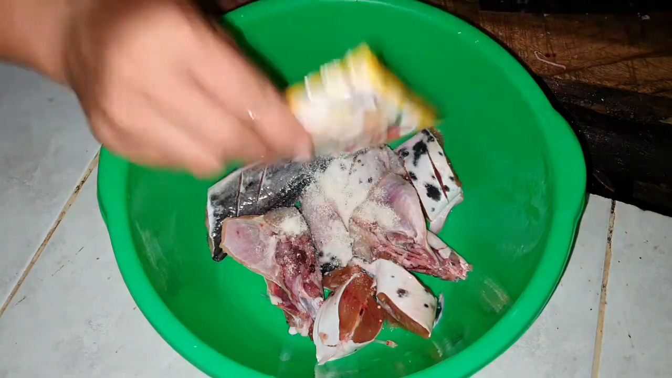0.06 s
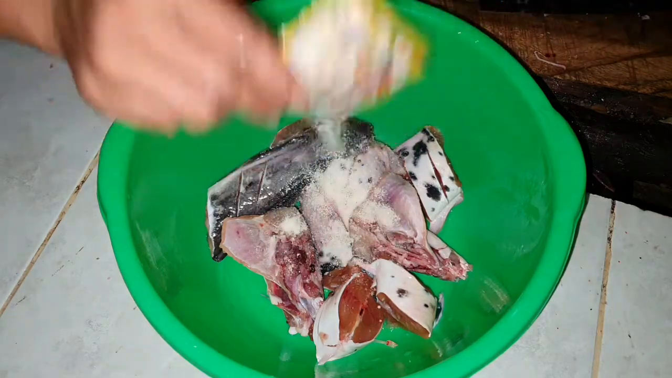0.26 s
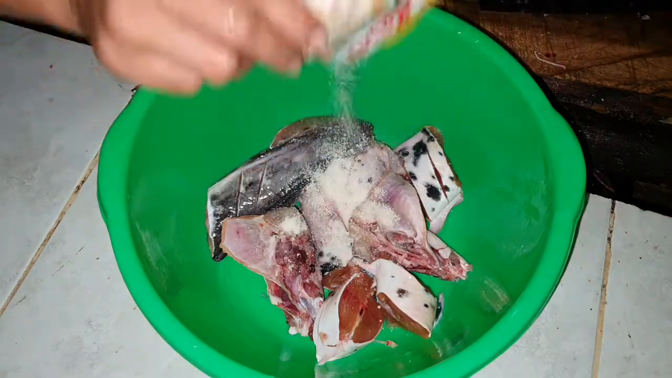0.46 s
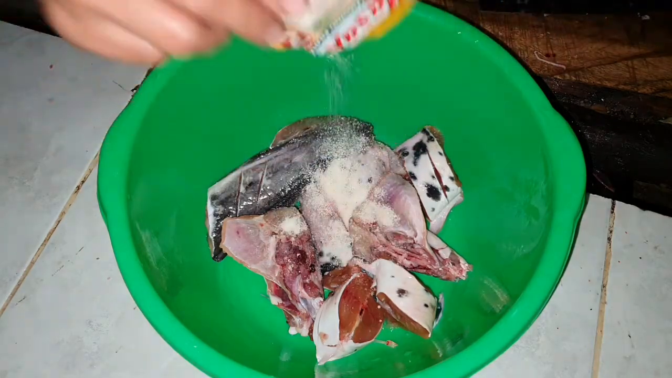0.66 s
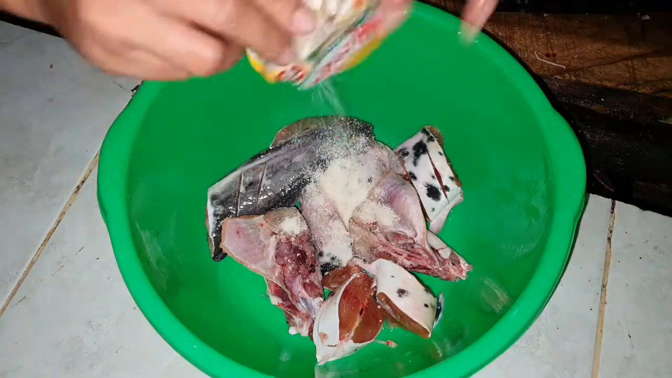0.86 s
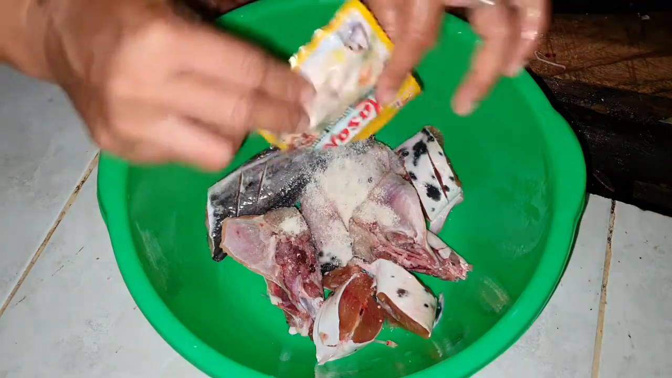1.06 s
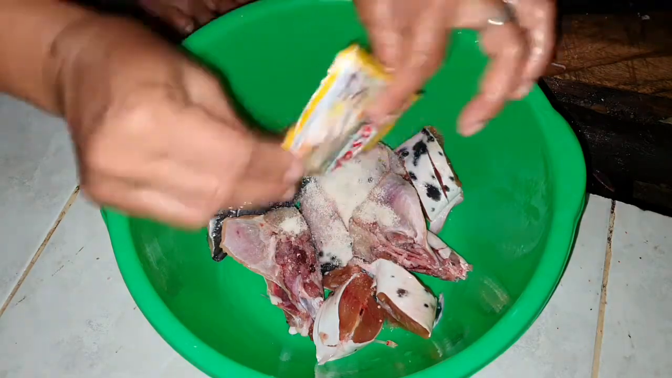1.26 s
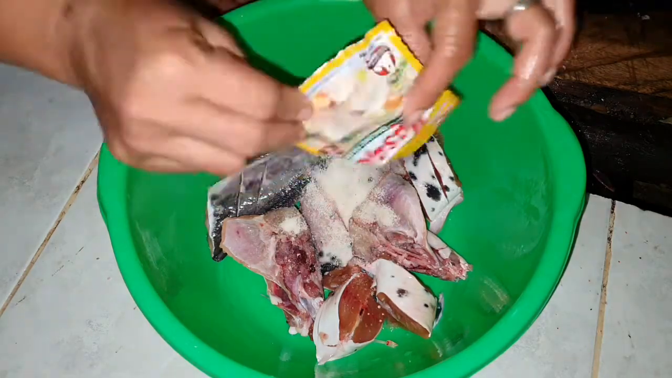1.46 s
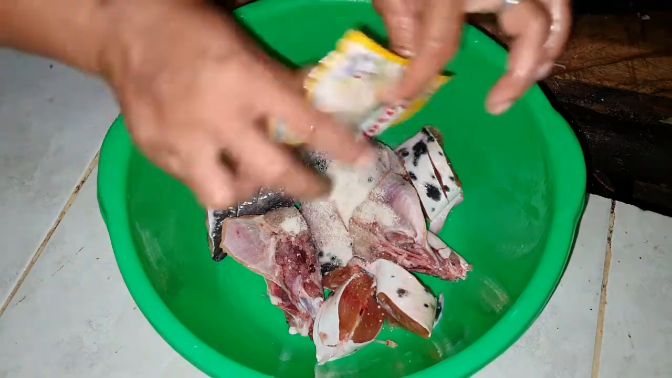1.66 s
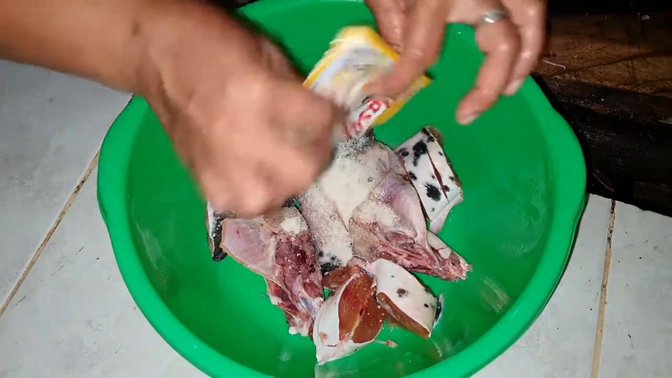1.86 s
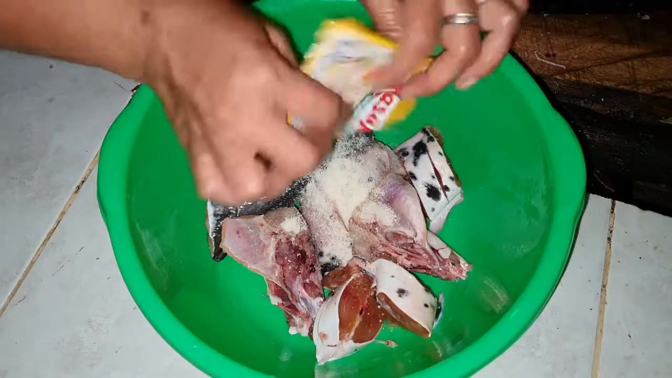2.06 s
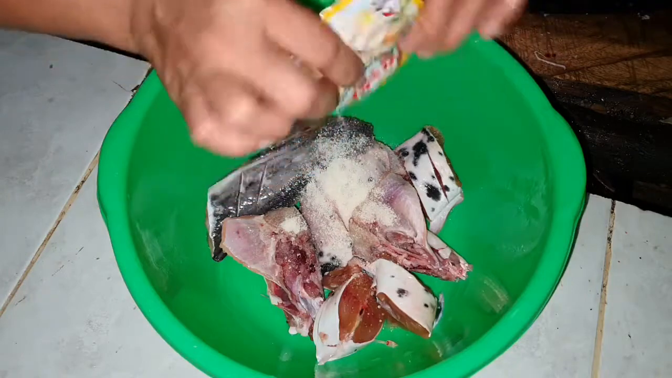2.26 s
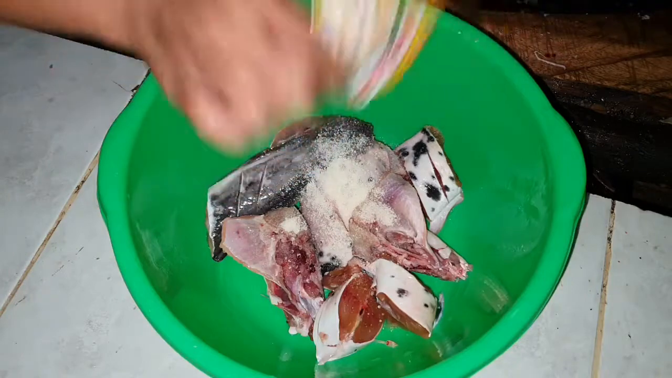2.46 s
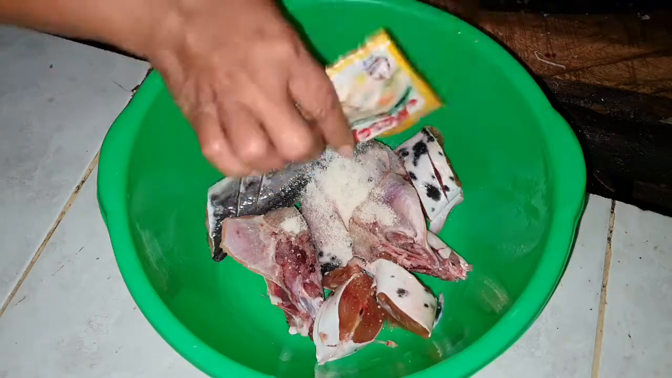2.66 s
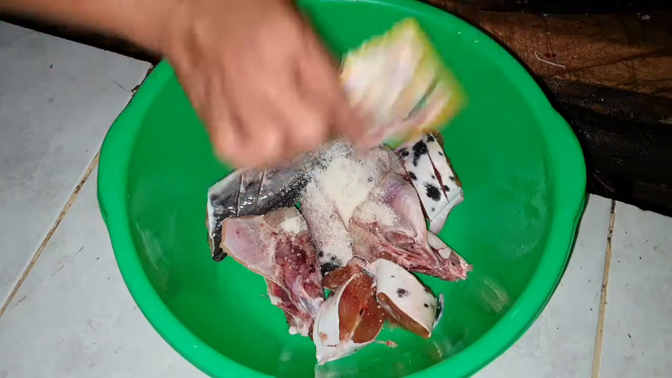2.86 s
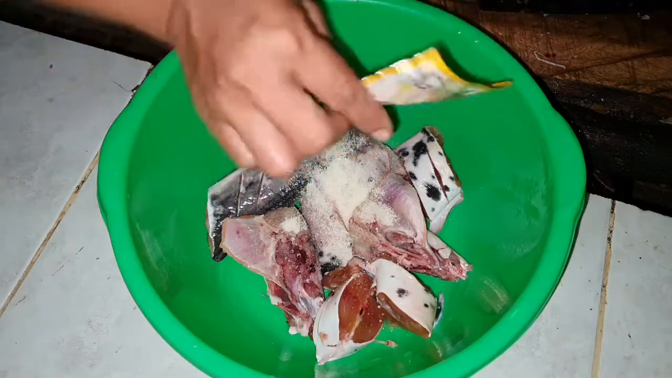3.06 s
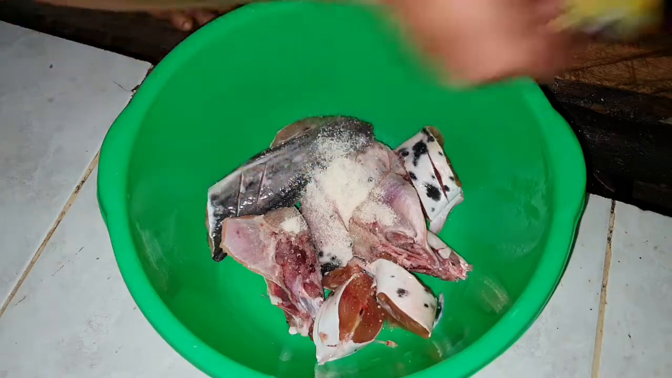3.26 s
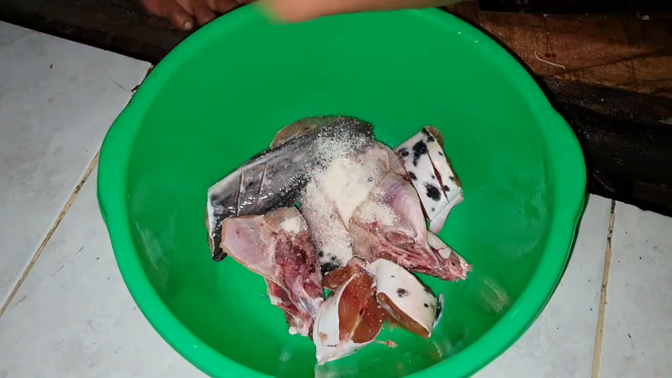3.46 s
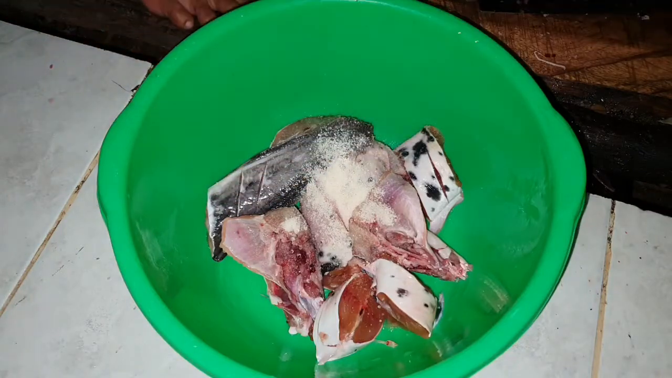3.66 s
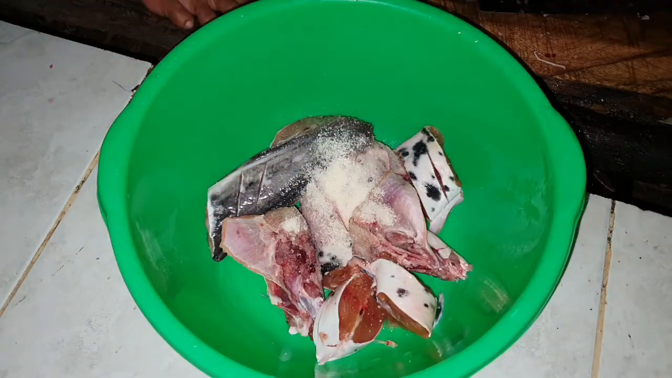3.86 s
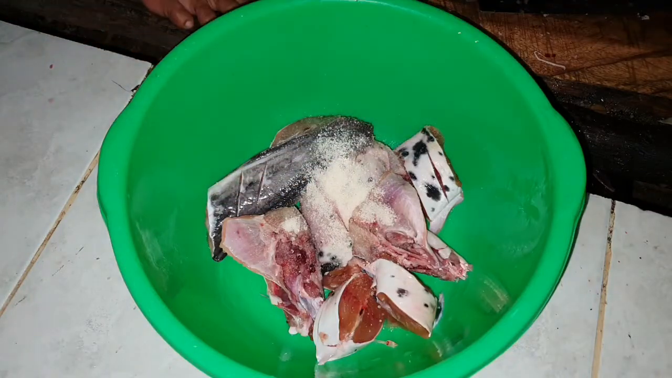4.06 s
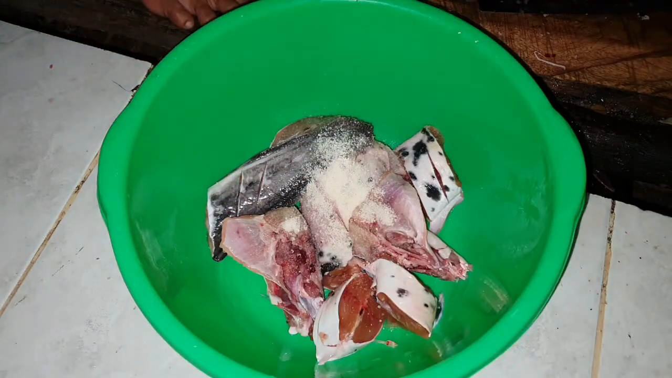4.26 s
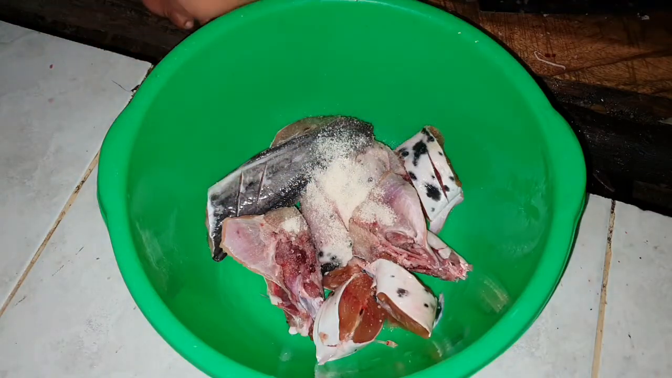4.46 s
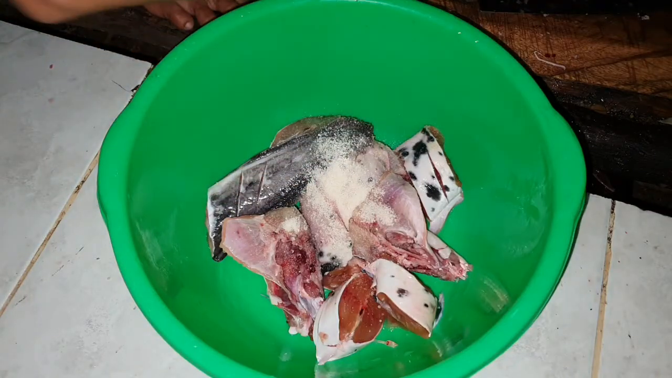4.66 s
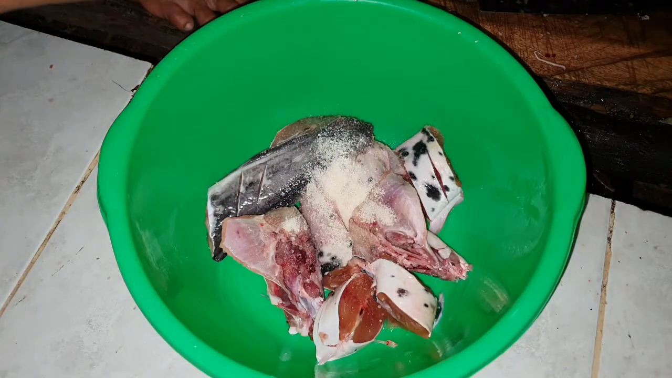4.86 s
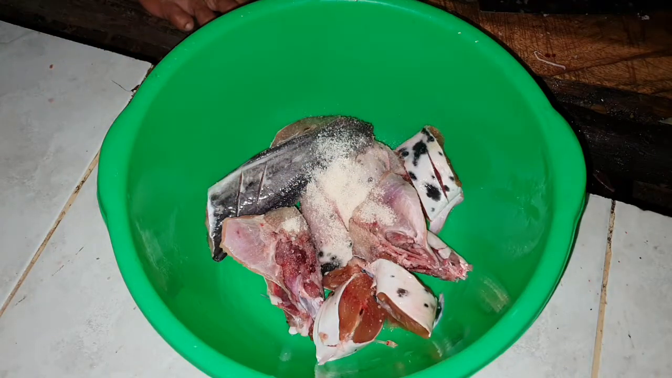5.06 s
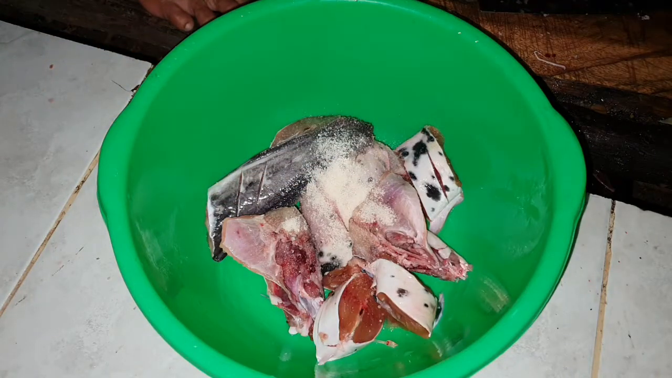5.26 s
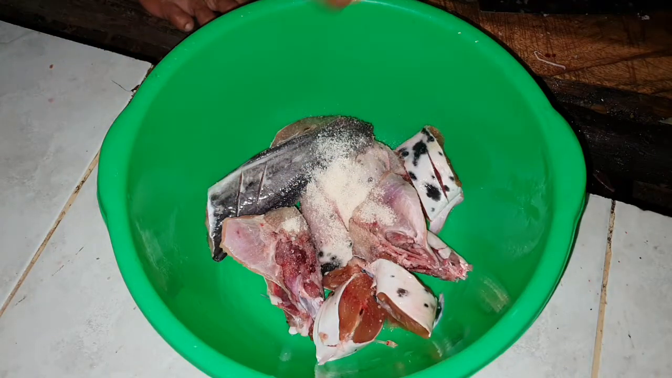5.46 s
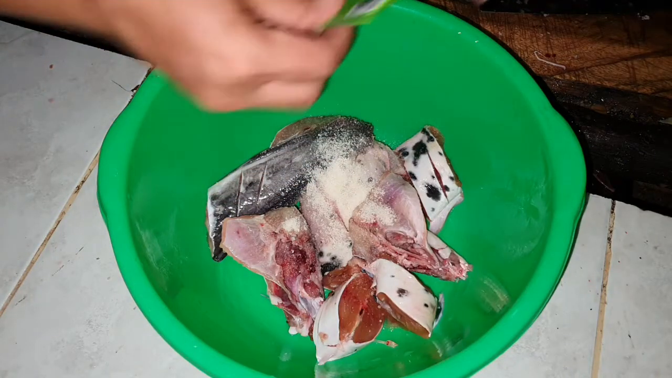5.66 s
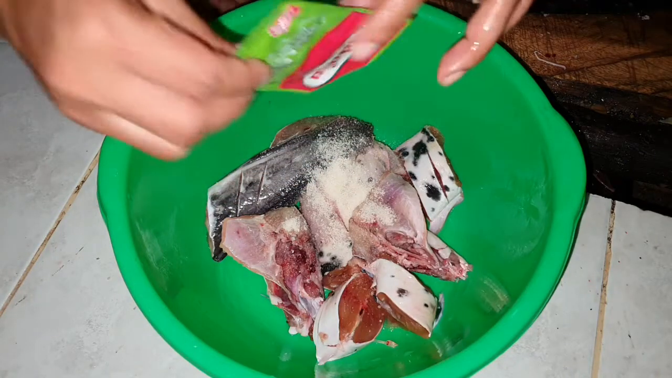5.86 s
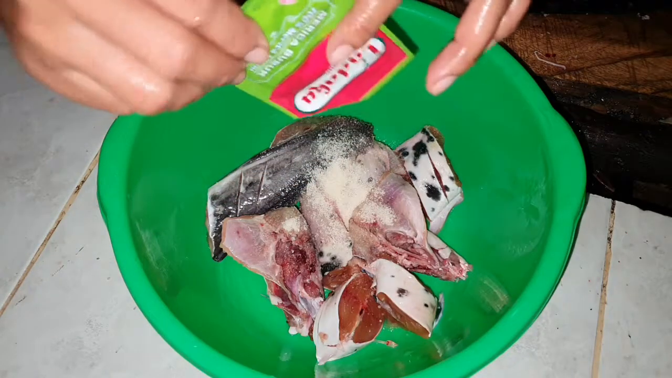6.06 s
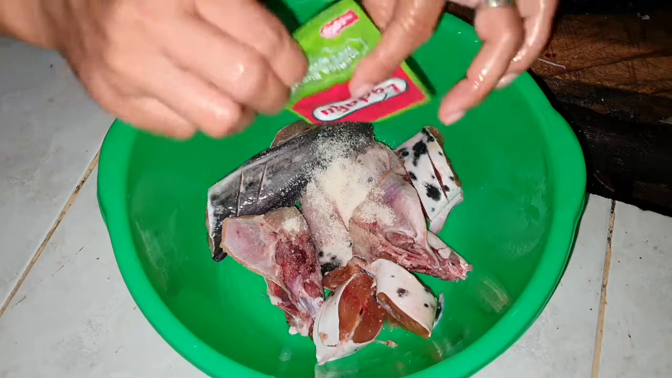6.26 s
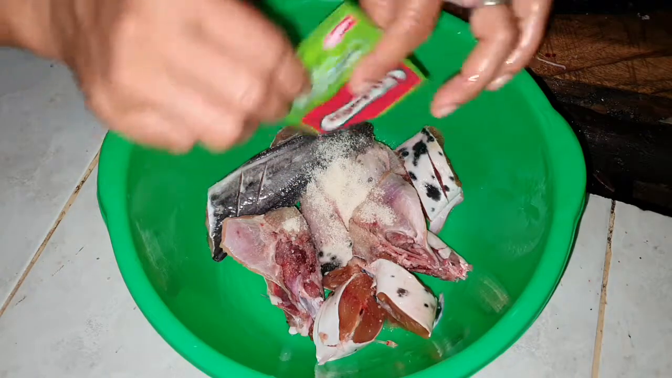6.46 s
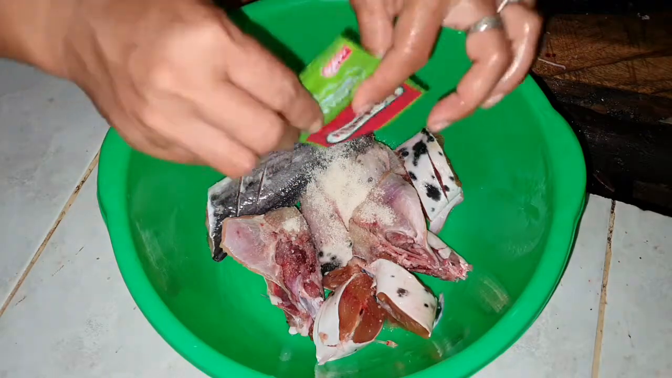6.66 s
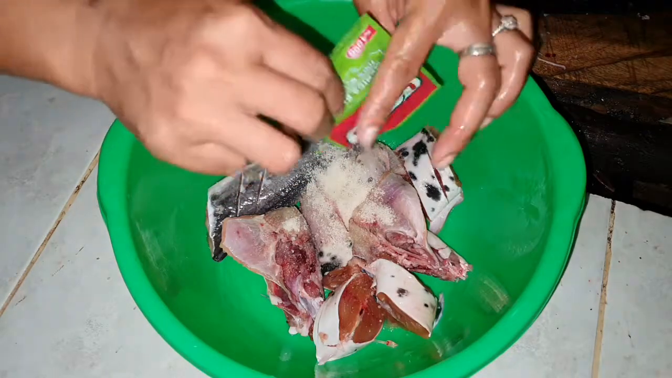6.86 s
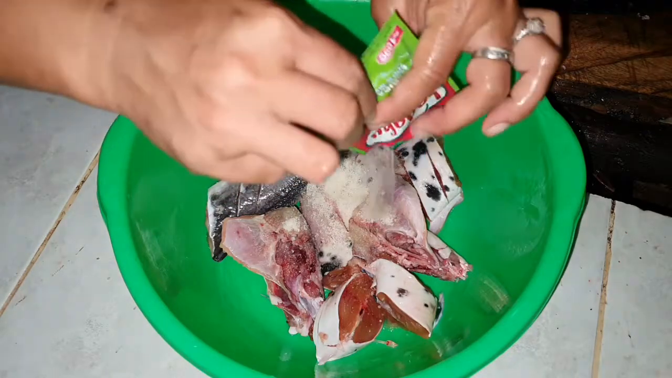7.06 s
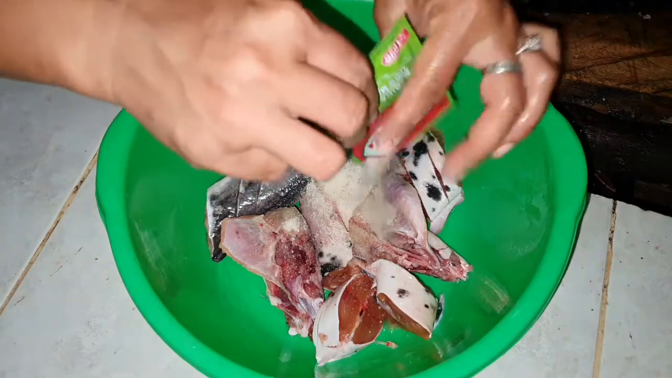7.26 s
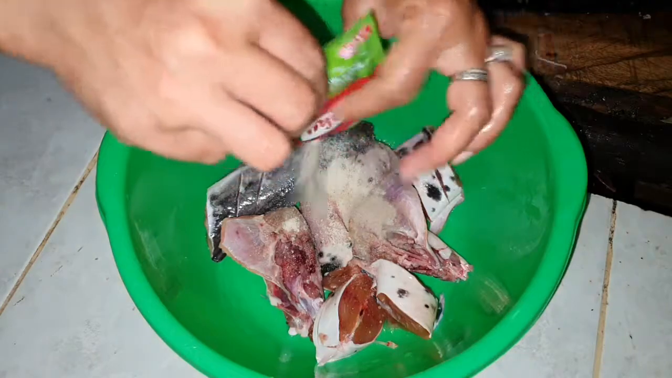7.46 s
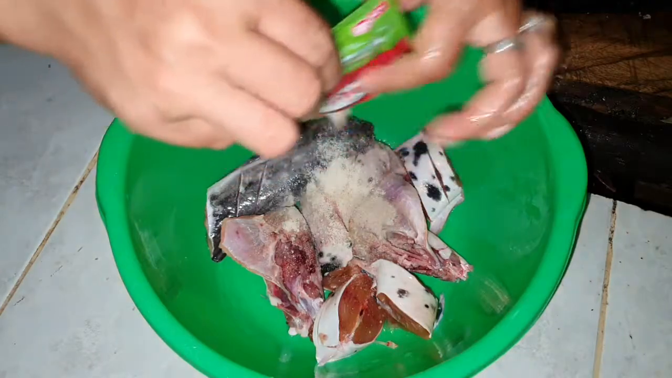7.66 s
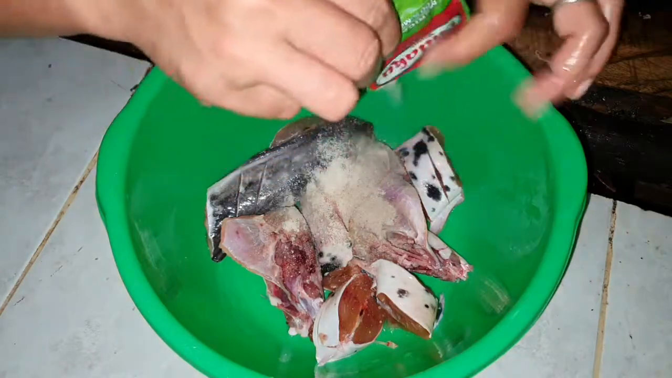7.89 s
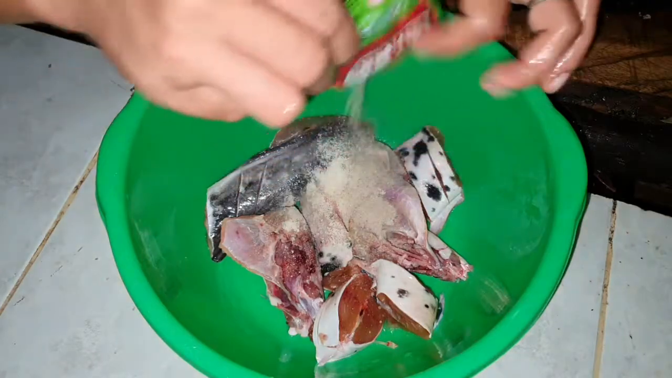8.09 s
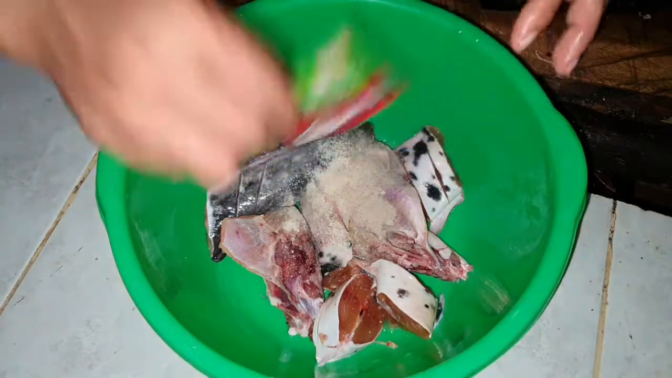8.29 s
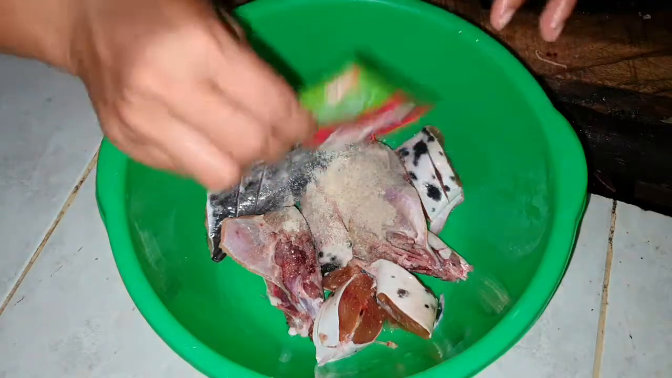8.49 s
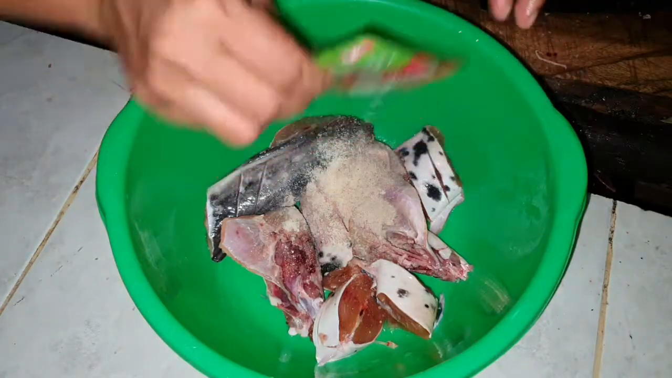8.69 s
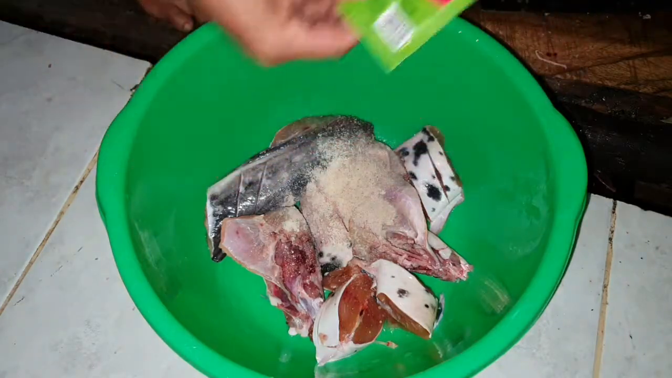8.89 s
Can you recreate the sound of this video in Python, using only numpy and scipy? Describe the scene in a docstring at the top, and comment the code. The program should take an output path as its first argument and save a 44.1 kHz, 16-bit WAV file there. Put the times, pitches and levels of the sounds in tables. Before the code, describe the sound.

Fingers work two thin seasoning packets near a stereo microphone in an open kitchen. Grainy powder shakes come first, then a dense burst of bright, crisp crinkling, a few softer shakes, and a quieter stretch of scattered clicks with a small drip and a faint frog outdoors. Then the second packet crackles strongly before easing off to two tiny drips. Insects whine steadily over soft rumble; little room echo.

```python
"""Open kitchen at night: a small plastic packet close to a two-port microphone, over a plastic basin.
First it is shaken and its powder rattles; from 0.7 s the film snaps and rustles, and at 1.7 s it is pinched shut.
Short shakes follow at 2.5 s; from 3.1 s the packet is handled further off, and a drop plops nearby.
From 6.1 s a second packet crinkles close by; two more drops plop at the end. Fingers knock at 0.9 and 5.6 s.
Outside, a frog trills between 2.9 and 5.7 s; an insect chorus whines and a low rumble lies under it all."""
import sys
import numpy as np
from scipy import signal
from scipy.io import wavfile

SR = 44100
rng = np.random.default_rng(int(sys.argv[2]) if len(sys.argv) > 2 else 0)


def dump_mix(stems):
    """Bounce the given channels to the path in sys.argv[1] as a 16-bit WAV at rate SR."""
    frames = np.atleast_2d(stems).T  # one column per channel
    limited = np.clip(frames, -1, 1)  # hard clip at full scale
    pcm = np.round(limited * 32767).astype(np.int16)
    wavfile.write(sys.argv[1], SR, pcm)


N = 393813

# Close: powder thrown against the film: (peak time [s], level [dB], swell per 10 dB on the flank [ms])
SHAKES = [(0.123, -30, 19.4), (0.305, -30, 22), (0.462, -32, 15), (0.63, -33.5, 16.6), (0.846, -39, 19),
          (0.942, -27, 12), (2.505, -38.5, 5.2), (2.568, -38, 6.9), (2.655, -44.5, 2), (2.741, -43, 6.2),
          (2.834, -43, 2.7), (2.902, -43, 7.5), (3.002, -45, 2.2), (4.16, -56, 11), (4.43, -46.5, 25)]
# Close: powder sliding about in the held packet: (time [s], level [dB])
SLIDING = [(0, -56), (.9, -56.5), (1.0, -40), (1.15, -48), (2.4, -51.5), (3.2, -56), (3.35, -73)]
# Colour of the powder: (frequency [Hz], level [dB per Hz])
POWDER_COLOUR = [(700, -28), (1500, -14), (5110, -6), (7540, -2.5), (13800, -15), (16000, -4)]
# Folds that snap through: (peak time [s], level [dB], dull part over bright [dB], t60 [ms], below 5 acts as 5)
SNAPS = [(0.724, -29, 17, 18), (0.912, -26.5, 19, 66), (1.067, -34, -24, 15), (1.179, -23.5, -7, 17),
         (1.214, -20.5, 4, 45), (1.239, -22, -4.5, 87), (1.286, -26, 33, 19), (1.323, -24.5, -18, 27),
         (1.4, -16, 12.5, 41), (1.425, -20.5, 5, 18), (1.473, -21, 12, 19), (1.498, -22, -10, 37),
         (1.511, -21, 19, 64), (1.55, -25.5, 53, 18), (1.614, -27, -1, 41), (1.654, -33, -8, 62),
         (1.806, -19.5, -5.5, 59), (1.886, -24.5, 13, 25), (1.937, -14, 3.5, 56), (1.952, -15.5, 2, 18),
         (2.005, -19.5, 7, 70), (2.017, -20, -19, 49), (2.047, -34, 13, 16), (2.07, -33, -24, 48),
         (2.135, -20.5, -3, 44), (2.173, -16.5, 2, 24), (2.231, -28.5, -24, 6.7), (2.261, -29.5, 7, 18),
         (2.286, -36.5, -44, 9), (2.296, -22, 20, 6), (2.325, -20.5, 33, 46), (2.342, -18.5, 3, 23),
         (2.371, -33.5, -26, 64), (2.395, -23, 3, 41), (2.414, -24, 10, 17), (3.23, -24, 11, 37),
         (3.443, -32, 9, 20), (3.608, -32.5, 12, 9.2), (3.736, -23, 1, 7.8), (3.858, -38, -10, 38),
         (4.233, -41.5, -12.5, 36), (4.706, -36, 26, 4.2), (4.82, -37.5, 31, 17), (4.907, -34.5, 8, 28),
         (5.072, -32.5, -11, 62), (5.091, -22.5, 2, 16), (5.353, -31.5, -12, 12.5), (5.363, -24, 4, 21),
         (5.562, -34, 3, 12.5), (5.687, -33, 39, 27), (5.945, -38.5, 37, 18), (6.152, -20, 15, 3.9),
         (6.184, -27, 14, 43), (6.23, -21, 2.5, 31), (6.26, -29.5, 1, 26), (6.295, -24.5, 16, 18),
         (6.365, -19.5, 7, 62), (6.385, -15, 10.5, 49), (6.449, -29, 1, 13), (6.463, -13.5, 11, 57),
         (6.489, -24.5, -4, 8.7), (6.536, -28, 11, 95), (6.568, -17.5, 19, 37), (6.58, -18.5, 3, 21),
         (6.631, -27, 17, 90), (6.658, -21, 15, 19), (6.78, -29.5, 24, 34), (6.809, -28, 7, 26),
         (6.825, -22.5, 10.5, 35), (6.849, -23, -10.5, 21), (6.857, -17.5, 12, 21), (6.99, -23.5, 5, 32),
         (7.019, -15, 2, 18.5), (7.052, -20.5, -7, 13), (7.101, -20.5, 4, 14), (7.114, -29.5, -34.5, 23),
         (7.121, -15.5, 19, 27), (7.201, -25, -2.5, 64), (7.34, -26, 0, 22), (7.379, -21, 19, 26),
         (7.453, -21.5, -3, 19.4), (7.467, -34, 9, 21), (7.528, -25.5, 2, 4.5), (7.648, -30, 36, 17),
         (7.677, -24, 22, 7.6), (7.714, -28.5, 3, 35), (7.814, -24.5, 14, 20), (7.856, -27.5, 12, 17),
         (7.915, -33.5, 20, 69), (8.022, -27.5, 17, 31), (8.046, -26.5, -3, 24), (8.067, -27.5, 21, 17),
         (8.09, -22, 24, 24), (8.105, -24.5, -10.5, 18), (8.173, -33, 35, 39)]
# Fingers working the film: (time [s], level [dB])
RUSTLE = [(0, -53), (.88, -50.5), (1.0, -37), (1.15, -44), (1.36, -33), (1.7, -61), (2.099, -38),
          (2.4, -51), (2.46, -66), (3.3, -59), (4.8, -57.5), (5.72, -64), (6.12, -68), (6.6, -41),
          (6.76, -55.5), (7.3, -49.5), (8.1, -52), (8.22, -60)]
# Colour of the film: (frequency [Hz], level [dB per Hz])
FILM_COLOUR = [(420, -16.5), (950, -11), (1200, -16.5), (1700, -7), (5500, -7.5), (8000, -4.5),
               (10000, -18.5), (14500, -14)]
# Edges of the bands in which the packet sounds: (frequency [Hz])
EDGES_HZ = 380 * 2 ** np.arange(0, 5.7, .4)
CENTRES_HZ = np.sqrt(EDGES_HZ[1:] * EDGES_HZ[:-1])
# Air and walls of the first packet before it is pinched shut: (frequency [Hz], width [Hz], level [dB])
OPEN_PACKET = [(1007, 48, 3.4)]
# The first packet pinched shut: (frequency [Hz], width [Hz], level [dB])
PINCHED_PACKET = [(1045, 85, 11), (1620, 200, -2), (2340, 110, 0)]
# The first packet handled further off: (frequency [Hz], width [Hz], level [dB])
ASIDE_PACKET = [(1930, 260, 1)]
# The second packet, close: (frequency [Hz], width [Hz], level [dB])
SECOND_PACKET = [(1023, 92, 1.5)]
# Fingers knocking softly on packet or basin: (time [s], level [dB], frequency [Hz])
KNOCKS = [(.935, -24, 395), (5.598, -31, 1765)]
# Drops of water nearby: (time [s], level [dB], starting frequency [Hz])
DROPS = [(3.278, -36.5, 1514), (8.366, -44, 1660), (8.515, -42.5, 1480)]
# Frog trills outside: (time [s], pulses [count], level [dB])
TRILLS = [(2.931, 10, -65.5), (4.126, 5, -57), (4.315, 4, -59.5), (5.394, 5, -62.5), (5.528, 5, -62.5)]
# Colour of the night's rumble and hiss: (frequency [Hz], level [dB per Hz])
NIGHT_COLOUR = [(25, -15), (45, -7), (97, 0), (160, -4), (225, -13), (450, -19), (700, -35), (2200, -29.5),
                (12000, -41)]
# Low hums that wander and come and go: (frequency [Hz])
DRONES_HZ = [70, 105, 140, 180]
# A far dull thud: (time [s], level [dB], frequency [Hz])
THUDS = [(4.43, -43.5, 89.7)]
# How alike the two ports hear the close packet: (frequency [Hz], likeness [0 to 1])
NEAR_LIKENESS = [(600, 0.95), (2000, 0.49), (5000, 0.39)]
# How alike the two ports hear far sounds: (frequency [Hz], likeness [0 to 1])
FAR_LIKENESS = [(130, 0.98), (290, 0.61), (640, 0.23), (1400, 0)]
# Sensitivity of the left port over the right: (frequency [Hz], level [dB])
LEFT_LOUDER = [(380, 0), (700, 1.5), (8100, 2), (15000, -0.5)]

SHAKE_FADE_S = 0.011   # per 10 dB on the falling flank
PINCH_S, ASIDE_S, SECOND_S = 1.7, 3.1, 6.1   # pinched shut, taken further off, second packet near
CRACK_DB = 7   # main crack of a snap over its volley
RISE_SHARE = 0.4   # build-up of a snap as a share of its decay
SETTLE_DB, SETTLE_T60_S = -23.5, 0.087   # the film rustles on after a snap, this far below it
FROG_HZ, FROG_WOBBLE_HZ, FROG_THROAT_WIDTH_HZ = 2900, 40, 240
FROG_PERIOD_S, FROG_SAG_HZ_PER_S = 0.0262, 350   # the pitch sinks through a trill
WHINE_HZ, WHINE_WIDTH_HZ, WHINE_DB = 7520, 480, -55.5   # the loudest insects
HIGH_HZ, HIGH_WIDTH_HZ, HIGH_DB = 10650, 1100, -68.5   # a fainter, higher kind
SHELF_LOW_HZ, SHELF_HIGH_HZ, SHELF_DB = 6440, 9390, -61.5   # broad hiss of other kinds
NIGHT_DB, DRONE_DB = -55, -70
HUM_HZ, HUM_WIDTH_HZ, HUM_DB = 305.3, 5.4, -77
LEFT_LEAD = 4   # samples by which direct sound reaches the left port first
CUTOFF_HZ = 15500


def film():
    """A snap is a quick volley of micro-cracks with its own colour; the rustle is many small creases."""
    dull = 1 / (1 + (CENTRES_HZ / 1460.0) ** 1.6) - 0.5   # positive in the low bands, negative in the high
    tracks = rustle(dull)
    add_snaps(tracks, dull)
    return packet_ring(coloured(tracks, FILM_COLOUR))


def rustle(dull):
    """Small creases give way in clumps, one track per band; light handling sounds duller."""
    effort_db = effort()
    gentle_db = 0.5 * (-35.5 - effort_db)
    clumps_db = 4.2 * drift(45)
    creases = from_db(effort_db + clumps_db) * grains(per_s=1200, spread_db=2.4)
    sizes_db = [2.94 * drift(60) for _ in range(7)]   # large and small creases take turns
    return np.array([creases * from_db(gentle_db * dull[k] + sizes_db[k // 2])
                     for k in range(len(CENTRES_HZ))])


def effort():
    """Level of the rustle in dB: the fingers' work plus the settling after each snap."""
    jolts = np.zeros(N)
    for s, snap_db, _, _ in SNAPS:
        jolts[round(s * SR)] = from_db(snap_db + SETTLE_DB)
    decay = from_db(-60 / (SETTLE_T60_S * SR))   # per sample
    settling = signal.lfilter([1], [1, -decay], jolts + 1e-18)
    work = from_db(np.interp(np.arange(N) / SR, *np.transpose(RUSTLE)))
    return 20 * np.log10(work + settling)


def add_snaps(tracks, dull):
    """A fold snaps through as a volley that builds faster than it dies, with one main crack at its peak."""
    before, after = 600, 2400   # samples around the peak
    t = np.arange(-before, after) / SR
    for s, level_db, dull_db, t60_ms in SNAPS:
        away = np.where(t < 0, -t / RISE_SHARE, t)
        shape = from_db(-60 * away / (max(t60_ms, 5) / 1000))
        volley = grains(per_s=3000, spread_db=3.2, size=len(t)) * shape
        volley[0, before] = from_db(CRACK_DB)
        chance_db = 2.5 * rng.standard_normal(len(CENTRES_HZ))
        colour_db = level_db + dull * dull_db + chance_db
        at = round(s * SR)
        tracks[:, :, at - before:at + after] += from_db(colour_db)[:, None, None] * volley


def packet_ring(dry_film):
    """The film sets the air and walls of the packet in hand ringing."""
    stage = np.searchsorted([PINCH_S * SR, ASIDE_S * SR, SECOND_S * SR], np.arange(N))
    out = dry_film.copy()
    for k, modes in enumerate([OPEN_PACKET, PINCHED_PACKET, ASIDE_PACKET, SECOND_PACKET]):
        for hz, width_hz, db in modes:
            out += from_db(db) * resonance(dry_film * (stage == k), hz, width_hz)
    return out


def powder():
    """Thousands of grains a second hit the film; the swarm swells and fades with each shake."""
    t = np.arange(N) / SR
    throw = from_db(np.interp(t, *np.transpose(SLIDING)))
    for s, level_db, swell_ms in SHAKES:
        away = (t - s) / np.where(t < s, swell_ms / 1000, SHAKE_FADE_S)
        throw += from_db(level_db - 10 * (np.sqrt(1 + away ** 2) - 1))   # round top, straight flanks in dB
    hits = grains(per_s=6000, spread_db=3.0) * from_db(1.5 * drift(90))
    return throw * rms_one(coloured([hits] * len(CENTRES_HZ), POWDER_COLOUR))


def plops(events, rise, t60):
    """One short dying note each; a bubble rises in pitch (octaves in 25 ms), a knock does not."""
    out, t = np.zeros(N), np.arange(round(t60 * SR)) / SR
    for s, db, hz in events:
        turns = np.cumsum(hz * 2 ** (rise * t / 0.025)) / SR
        onset = np.minimum(t / 0.0043, 1)
        at = round(s * SR)
        out[at:at + len(t)] += from_db(db - 60 * t / t60) * onset * np.sin(2 * np.pi * turns)
    return out


def kitchen(x, room_db, t60):
    """Direct sound reaches the left port first; floor and walls send a faint diffuse tail."""
    t = np.arange(round(0.3 * SR)) / SR
    tail = rng.standard_normal((2, len(t))) * from_db(room_db - 60 * t / t60) * (t > 0.004)
    direct = np.array([x[0], np.roll(x[1], LEFT_LEAD)])
    return direct + signal.oaconvolve(x.mean(axis=0)[None], tail, axes=1)[:, :N]


def frog():
    """Evenly spaced bell-shaped puffs of a wavering tone, roughened by noise in the throat resonance."""
    t, puffs = np.arange(N) / SR, np.zeros(N)
    for s, pulses, db in TRILLS:
        for k in range(round(pulses)):
            at = s + k * FROG_PERIOD_S
            near = slice(round((at - 0.02) * SR), round((at + 0.03) * SR))
            bell = np.exp(-0.5 * ((t[near] - at - 0.004) / 0.008) ** 2)
            puffs[near] += from_db(db + rng.normal(0, 1.5)) * bell
    starts = np.transpose(TRILLS)[0] - 0.02
    since = t - starts[np.maximum(np.searchsorted(starts, t) - 1, 0)]   # seconds into the trill
    pitch_hz = FROG_HZ - FROG_SAG_HZ_PER_S * since + FROG_WOBBLE_HZ * drift(21.65)
    tone = np.sin(2 * np.pi * np.cumsum(pitch_hz) / SR)
    throat = resonance(rng.standard_normal(N), FROG_HZ, FROG_THROAT_WIDTH_HZ)
    throat = resonance(throat, FROG_HZ, FROG_THROAT_WIDTH_HZ)
    return puffs * (tone + rms_one(throat))


def insects():
    """Many wings near one pitch, out of step, over a broad hiss with a sharp upper edge."""
    white = rng.standard_normal((2, 2, N))
    whine = resonance(resonance(white[0], WHINE_HZ, WHINE_WIDTH_HZ), WHINE_HZ, WHINE_WIDTH_HZ)
    shelf_filter = signal.butter(6, [SHELF_LOW_HZ, SHELF_HIGH_HZ], "band", fs=SR, output="sos")
    shelf = signal.sosfilt(shelf_filter, white[1])
    high = resonance(resonance(white[1, ::-1], HIGH_HZ, HIGH_WIDTH_HZ), HIGH_HZ, HIGH_WIDTH_HZ)
    throb_db = 0.3 * drift(40) + 0.8 * drift(0.33)
    chorus = from_db(WHINE_DB + throb_db) * rms_one(whine)
    chorus += from_db(SHELF_DB + 0.28 * drift(5.3)) * rms_one(shelf)
    chorus += from_db(HIGH_DB) * rms_one(high)
    return at_ports(*chorus, WHINE_HZ, FAR_LIKENESS)


def night():
    """Rumble and hiss as banded noise, most alike left and right in the bass, with hums and a far thud."""
    out, edges_hz = 0, 22 * 2 ** np.arange(0, 9.6, 0.45)
    white = rng.standard_normal((2, 2, N))
    for k, (low, high) in enumerate(zip(edges_hz, edges_hz[1:])):
        hz = np.sqrt(low * high)
        surge_db = 0.8 + 1.6 / (1 + hz / 400.0)   # the rumble surges more than the hiss
        gain = from_db(at_hz(NIGHT_COLOUR, hz) + surge_db * drift(1.27))
        out = out + gain * at_ports(*band(white[k % 2], low, high), hz, FAR_LIKENESS)
    hum = from_db(HUM_DB) * rms_one(resonance(white[0, 0], HUM_HZ, HUM_WIDTH_HZ))   # faint, wavering
    for hz in DRONES_HZ:
        level_db = DRONE_DB + 6 * drift(0.8)
        pitch_hz = hz * 2 ** (drift(0.4) / 8)
        hum += from_db(level_db) * np.sin(2 * np.pi * np.cumsum(pitch_hz) / SR)
    return from_db(NIGHT_DB) * rms_one(out) + hum + plops(THUDS, rise=0, t60=0.36)


def at_ports(shared, own, hz, likeness):
    """Both ports hear a shared part and a part of their own; their sensitivity differs with frequency."""
    alike = np.clip(at_hz(likeness, hz), -1, 1)
    sides = np.sqrt(1 + alike) * shared + np.sqrt(1 - alike) * own * [[1], [-1]]
    return sides * from_db(at_hz(LEFT_LOUDER, hz) * np.array([[0.5], [-0.5]]))


def coloured(tracks, spectrum):
    """Each track sounds in its own band; alternate signs let neighbours join without a notch."""
    out = 0
    for k, hz in enumerate(CENTRES_HZ):
        shared, own = band(tracks[k], EDGES_HZ[k], EDGES_HZ[k + 1])
        gain = (-1) ** k * from_db(at_hz(spectrum, hz))
        out = out + gain * at_ports(shared, own, hz, NEAR_LIKENESS)
    return out


def grains(per_s, spread_db, size=N):
    """Random clicks of very uneven size, in two rows with signs of their own; rms 1."""
    sizes = from_db(spread_db * np.minimum(rng.exponential(1, size), 4))
    signed = sizes * rng.choice([-1, 1], (2, size))
    return rms_one(signed * (rng.random(size) < per_s / SR))


def resonance(x, hz, width_hz):
    """Two-pole resonance, gain 1 on top."""
    r = np.exp(-np.pi * width_hz / SR)
    poles = [1, -2 * r * np.cos(2 * np.pi * hz / SR), r * r]
    return signal.lfilter([(1 - r * r) / 2, 0, (r * r - 1) / 2], poles, x)


def band(x, low, high):
    """Butterworth band-pass."""
    return signal.sosfilt(signal.butter(2, [low, high], "band", fs=SR, output="sos"), x + 1e-18)


def drift(rate):
    """Slow chance of rms 1: noise low-passed near rate [Hz], drawn at every 40th sample."""
    r = np.exp(-80 * np.pi * rate / SR)
    slow = signal.lfilter([1], [1, -2 * r, r * r], rng.standard_normal(N // 40 + 2002))
    slow = slow[2000:]   # past the filter's start
    return np.interp(np.arange(N) / 40, np.arange(len(slow)), rms_one(slow))


def at_hz(points, hz):
    """Reads a spectrum on a log frequency axis."""
    points_hz, values = np.transpose(points)
    return np.interp(np.log(hz), np.log(points_hz), values)


def rms_one(x):
    """Scaled to rms 1."""
    return x / np.sqrt(np.mean(x ** 2) + 1e-20)


def from_db(db):
    """dB to gain."""
    return 10 ** (np.asarray(db) / 20)


def scene():
    """Packet, drops, knocks and frog heard through the kitchen, over the night outside."""
    notes = plops(DROPS, rise=0.49, t60=0.039) + plops(KNOCKS, rise=0, t60=0.023)
    indoors = kitchen(film() + powder() + notes + frog(), room_db=-38.0, t60=0.33)
    return indoors + insects() + night()


def record(dry):
    """Low-pass: the top fades from 15.5 kHz and is at least 70 dB down above 16.6 kHz."""
    soft = signal.sosfilt(signal.butter(24, CUTOFF_HZ, fs=SR, output="sos"), dry)
    return signal.sosfilt(signal.cheby2(14, 70, 16600, fs=SR, output="sos"), soft)


dry = scene()
out = record(dry)
dump_mix(out)
```